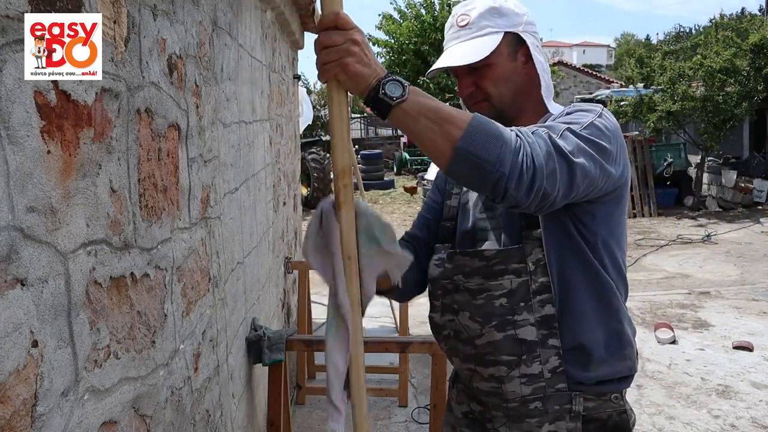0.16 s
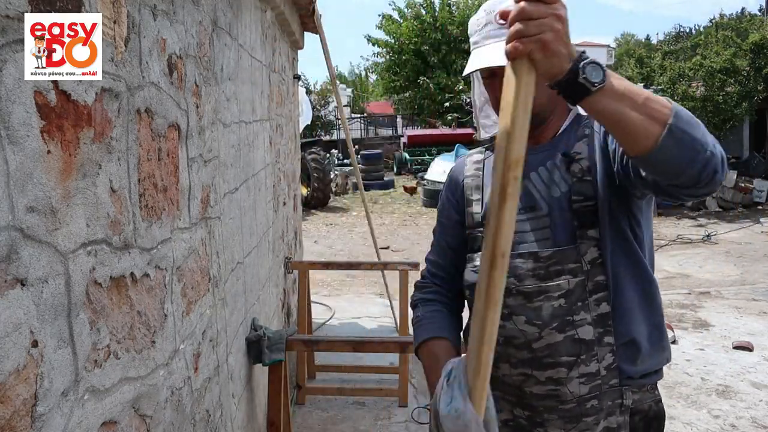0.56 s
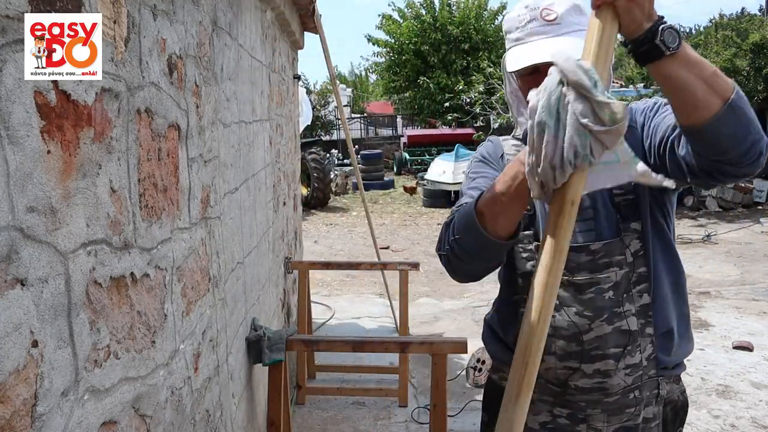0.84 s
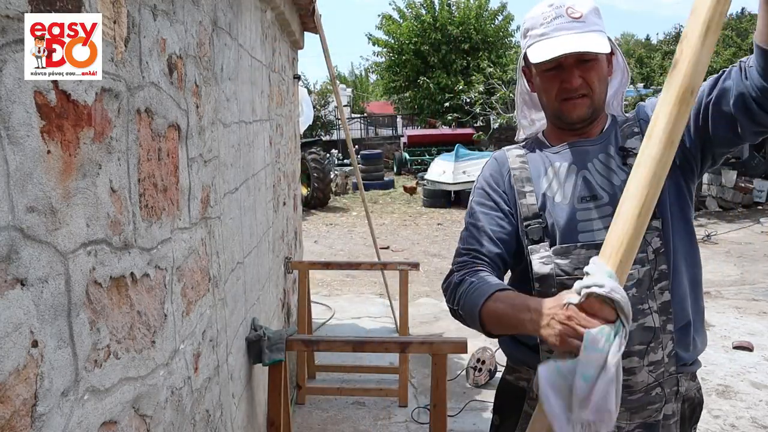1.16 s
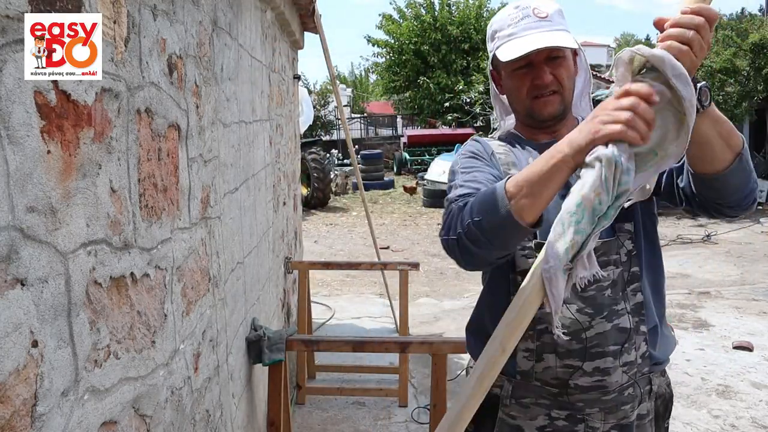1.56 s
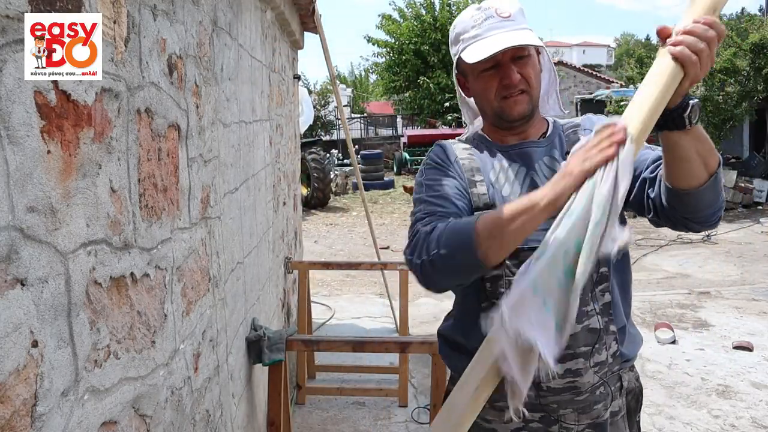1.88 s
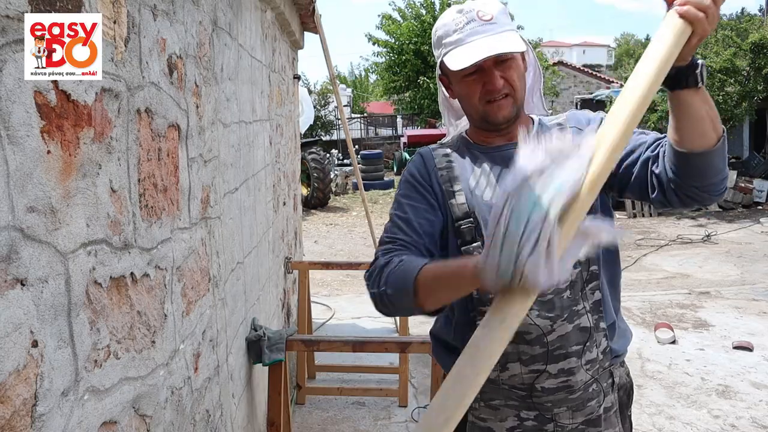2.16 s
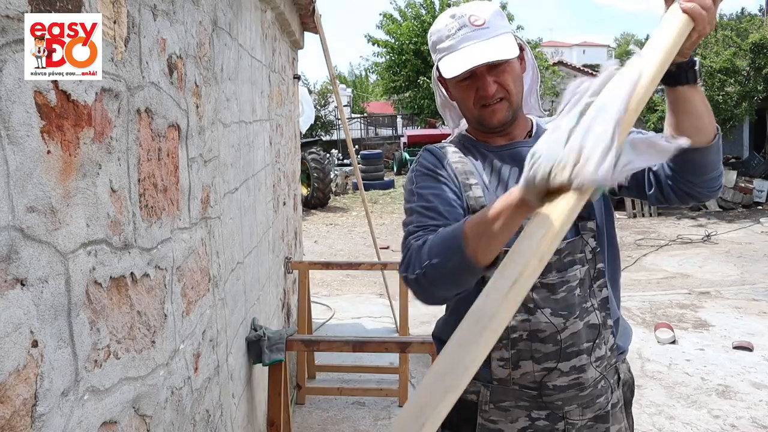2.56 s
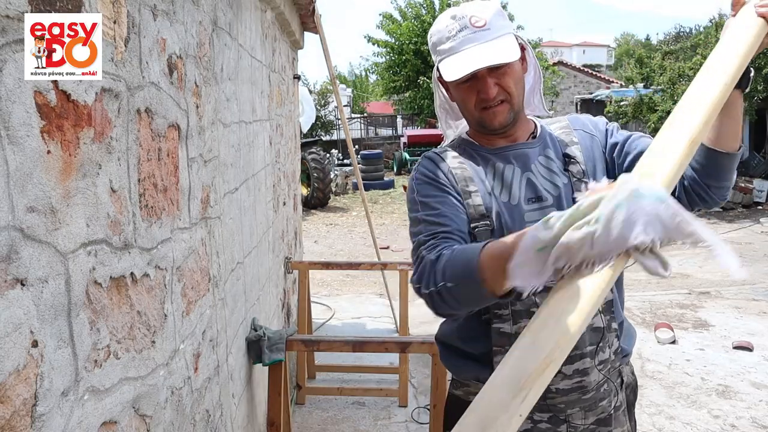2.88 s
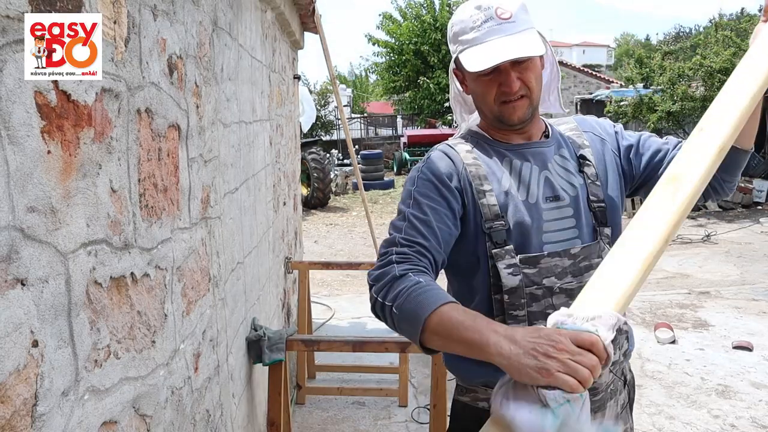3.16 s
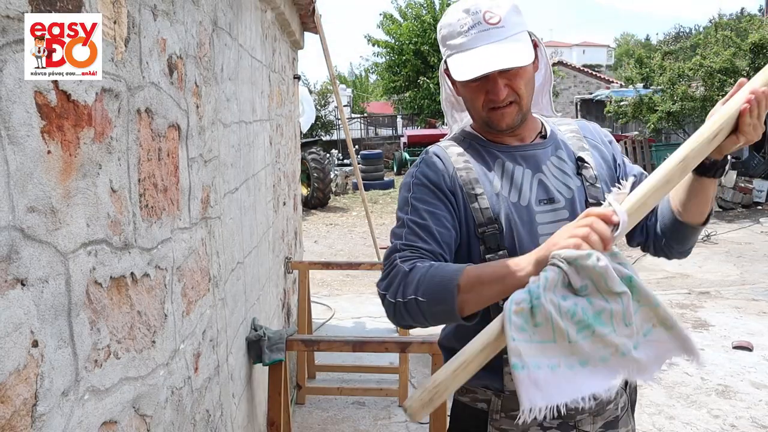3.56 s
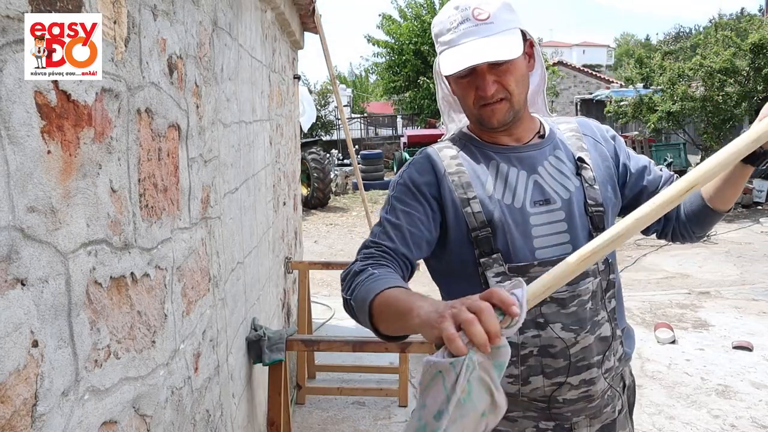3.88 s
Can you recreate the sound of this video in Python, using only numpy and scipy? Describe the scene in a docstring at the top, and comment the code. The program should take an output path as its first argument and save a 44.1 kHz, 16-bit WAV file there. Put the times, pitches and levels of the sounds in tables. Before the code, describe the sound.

A damp cloth rubs a wooden oar in quick uneven strokes outdoors, with short wooden knocks early and soft low wind thumps.

```python
"""Outdoors, close to a mono camera microphone, a damp cloth is rubbed up and down a wooden oar: shaped noise hisses
with each stroke from the start, mostly muffled below 5 kHz, coming forward abruptly for moments of 13 to 260 ms.
A faint yard floor and breeze lie under it from the first moment, both coloured noise; from about 0.1 s gusts
and the flapping cloth rumble on the microphone, with single low thumps. The oar's ringing modes knock
clearly near 0.2 and 0.5 s, then fainter to the end; wet threads tick as bright noise bursts near 0.75 s."""
import sys
import numpy as np
from scipy import signal
from scipy.fft import rfft, irfft
from scipy.io import wavfile
from scipy.ndimage import uniform_filter1d

SR = 44100
rng = np.random.default_rng(int(sys.argv[2]) if len(sys.argv) > 2 else 0)


def wav_out(sig):
    """Save sig, one row per channel (or a flat mono array), as 16-bit PCM at SR to the path in sys.argv[1]."""
    wavfile.write(sys.argv[1], SR, np.round(np.clip(np.atleast_2d(sig).T, -1, 1) * 32767).astype(np.int16))


N = 177723
T = np.arange(N) / SR
HZ = np.fft.rfftfreq(N, 1 / SR)

# Strokes, each lasting until the next begins: start_s, speed_up_ms, hold_ms, slow_down_roundness (1 = straight
# in dB), hiss at 6-9.5 kHz as turn_db, full_db, held_db, treble_gain_db (above 9.5 kHz, during the hold),
# band levels against the hiss (below_3k_db, 3k_to_5k_db, 5k_to_6k_db, 9k5_to_12k_db, above_12k_db),
# extra sinking as a share of the hiss's (low_speeding_up, low_slowing_down, top_speeding_up, top_slowing_down)
HAND_STROKES = [(-.1, 87, 103, 1.24, -62, -39, -39.5, -0.5, (-7.5, -21, -1.5, -2.5, -3),
                (-.4, -.5, .2, .05)),
                (0.186, 74, 146, 1.34, -62.5, -38.5, -48.5, 3.5, (-8.5, -16, -1, -4.5, -5),
                (-0.59, .8, 0.21, .3)),
                (0.464, 75.4, 113, 0.97, -70, -41, -39, -5.5, (-2.5, -11, -1, -0.5, 0.5),
                (-0.15, .2, -0.14, .1)),
                (0.809, 75, 66, 0.98, -65, -41.5, -40.5, 3, (-8.5, -15, -1.5, -2, -2),
                (-0.69, .05, .6, .2)),
                (1.038, 77.5, 166, 0.44, -67.5, -39.5, -41, -3.5, (-3, -13, -1, -2.5, -1),
                (-0.25, .1, -0.0037, .3)),
                (1.411, 108, 5.3, 0.97, -66.5, -51, -48, 2, (-6, -11, -2, -3.5, -1), (-0.95, -.4, 1, .05)),
                (1.683, 142, 50, 0.92, -78.5, -42, -45, 6, (-4, -9.5, -1.5, -5.5, -11.5),
                (-0.13, 0.28, -0.37, .6)),
                (1.931, 51.4, 113, 1, -61.5, -42.5, -44.5, 2.5, (-15.5, -18.5, -5, -2.5, -4),
                (0.049, .05, 0.89, -.1)),
                (2.18, 110, 33, 1.26, -72, -42.5, -42, 2.5, (-10.5, -13, -2.5, -3.5, -4.5),
                (-0.74, -.1, .1, .5)),
                (2.441, 60, 39, 1.53, -62.5, -48, -48, -1, (-12.5, -13, -4, -4.5, -19),
                (-0.9, -.5, -.2, -.4)),
                (2.662, 89, 88, 1.3, -84.5, -42, -46, -1, (-11.5, -13.5, -2.5, 0, -5.5),
                (-0.75, -.2, -0.23, .5)),
                (2.907, 49.6, 117, 1.3, -62, -42, -55, 3, (-15, -15.5, -4.5, -5, -17),
                (-0.35, -.5, -0.24, -.5)),
                (3.14, 105, 54, 0.77, -82, -42.5, -43, 4, (-10.5, -13, -2.5, -7.5, -8),
                (-0.54, -.2, .1, .1)), (3.421, 66, 94, 0.73, -70.5, -43.5, -44, -0.5, (-10, -12, -8, 0, -5),
                (-0.41, .05, 0.094, -.1)),
                (3.666, 95.5, 120, 2.3, -72.5, -41.5, -44, 0.7, (-2.5, -11.5, 0.5, -4.5, -4.5),
                (-0.27, .05, 0.21, 0.18)),
                (4.002, 25, 50, 1.1, -64.5, -57, -55, .3, (-16, -4.5, 6, -10, -15), (.05, .05, .1, .1))]
# Extra sinking shared by all strokes, rows 3-5, 5-6 and 9.5-12 kHz: speeding_up_share, slowing_down_share
BAND_SINKS = [(-.3, .1), (-.1, .05), (.15, 0.019)]
# Part of the extra sinking of the nearer end of the spectrum taken on by those three bands: share
NEIGHBOUR_SHARES = [0.2, 0.078, 0.13]
# Moments the rub comes forward: start_s, end_s, level_db (1.3-3 kHz), softer_start_db, softer_end_db,
# mid_db (3-5 kHz against it), hand_hollow_from_hz, hand_hollow_to_hz, lift_from_db, lift_to_db (below 1.3 kHz),
# lowest band reached (first_hz, first_ms, then_hz, last_hz, last_ms)
FORWARD_MOMENTS = [(0.0, .165, -32.5, -5.5, 21.3, -1.5, 1910, 1630, 8, 10.5, (740, 100, 740, 950, 30.2)),
                   (.2, .338, -39, 5.5, 3, -0.5, 1520, 1950, 17, 4, (520, 30, 790, 620, 5)),
                   (.35, .372, -43, -15, 8.8, -4, 1660, 1670, 3, 5, (690, 5, 750, 950, 5)),
                   (.5, .722, -32.5, 7.5, 7.9, -5, 2100, 2430, 15.5, -13, (740, 161, 1110, 1200, 35.3)),
                   (.929, .942, -36.5, 8, 15, -4, 2250, 2050, -1, -8, (950, 5, 950, 950, 5)),
                   (1.098, 1.301, -32, 2, 12.2, -3.5, 2160, 1950, 4, 1.5, (570, 51.6, 1080, 1190, 59.4)),
                   (1.808, 1.821, -39, 4, 4.9, -1, 1970, 2070, 5, 9.5, (890, 5, 860, 890, 5)),
                   (1.849, 1.9, -39, -2, 6.1, -4.5, 2160, 2050, -2, 10, (820, 31, 630, 610, 5)),
                   (2.34, 2.36, -39, -10, 3, -5.5, 2000, 1880, 2, -10, (270, 5, 210, 290, 5)),
                   (3.279, 3.322, -39.5, -6, 10, -1.5, 1970, 2000, 4, -8, (350, 5, 380, 430, 5)),
                   (3.728, 3.985, -32.5, 0.2, 19, -3, 1900, 1780, 8, 9, (740, 48, 1080, 740, 85.4))]
# Borders of the bands of the rub: edge_hz
BAND_EDGES_HZ = [150, 300, 450, 600, 780, 1000, 1130, 1250, 3050, 5000, 6100, 9500, 12000, 16000]
# Bending modes of the oar shaft: pitch_hz, width_hz, rubbed_db, struck_db (both relative)
SHAFT_MODES = [(138, 50, -30, -1), (278, 30, -20, -2), (510, 60, -20, -14), (650, 60, -16, -10),
               (856, 22, -6, -4), (1012, 40, -8, -8), (1190, 35, 3, -16), (1378, 35, 3, -17),
               (1588, 45, 2, -19), (1800, 50, 3, -20), (2045, 60, 4, -22), (2290, 80, 3, -24),
               (2500, 70, 2, -26), (2815, 90, 2, -28), (3180, 90, -4, -30), (3525, 90, -4, -30)]
# Colour of cloth on grain: pitch_hz, density_db (per Hz, relative)
CLOTH_COLOUR = [(650, -13), (1100, -12.5), (1200, -11.5), (1480, -4), (2020, -6.5), (3600, -4),
                (4160, -3.5), (5420, -3), (9970, -4.5), (13300, -5), (15500, -7.5)]
# A narrow band of the rub swells and fades, or the cloth thuds: start_s, end_s, from_hz, to_hz, width_hz, level_db
NARROW_SWELLS = [(0, 0.064, 1234, 1214, 60, -35.5), (0.2, 0.223, 616, 517, 350, -42.5),
                 (0.205, 0.206, 1500, 1130, 150, -25), (0.262, 0.326, 1570, 1570, 50, -42.5),
                 (0.34, 0.379, 1620, 1570, 80, -46), (0.499, 0.53, 150, 130, 90, -35),
                 (0.533, 0.722, 2930, 3430, 865, -34.5), (0.549, 0.655, 945, 960, 118, -51),
                 (0.764, 0.86, 5250, 5400, 500, -56.5), (0.792, 0.864, 1960, 2050, 200, -54),
                 (0.992, 1.11, 1820, 1950, 150, -55.5), (1.17, 1.224, 2750, 2040, 120, -34.5),
                 (1.231, 1.309, 1327, 1367, 60, -41), (1.395, 1.675, 5540, 5500, 500, -56),
                 (1.426, 1.503, 2050, 1970, 200, -56), (1.5, 1.71, 577, 576, 314, -59.5),
                 (2.036, 2.13, 1530, 1500, 150, -61), (1.961, 2.033, 2400, 2440, 200, -55),
                 (2.336, 2.364, 506, 500, 404, -47), (2.384, 2.44, 300, 300, 200, -61),
                 (2.677, 3, 500, 600, 400, -63), (3.28, 3.326, 1790, 1796, 91, -40),
                 (3.283, 3.324, 810, 750, 151, -48.5), (3.562, 3.627, 306, 267, 188, -48),
                 (3.735, 3.777, 1690, 1890, 80, -33), (3.808, 3.842, 2040, 2080, 80, -40),
                 (3.858, 3.967, 860, 810, 302, -57), (3.859, 3.93, 2140, 1420, 121, -35)]
# Colour of the yard floor: pitch_hz, density_db (per Hz, relative)
YARD_COLOUR = [(71, -20), (120, 6.5), (160, 4), (734, 4), (864, 6), (1270, 3), (1590, 2), (4770, -12),
               (5280, -12), (11700, -11), (15500, -8)]
# Colour of wind on the microphone: pitch_hz, density_db (per Hz, relative)
RUMBLE_COLOUR = [(15, 3), (40, -5), (80, -5.5), (125, -13), (150, -19), (300, -32), (600, -39), (1200, -88)]
# Gusts and flaps of the cloth: peak_s, level_db, rise_ms, fall_ms (each for 20 dB)
GUST_ROWS = [(0.129, -72, 40, 50), (.215, -63, 60, 70), (.54, -47.5, 118, 120), (.652, -49, 20, 67),
             (.745, -47.5, 100, 86), (1.103, -46.5, 84, 92), (1.275, -32, 27, 126), (1.34, -56, 82, 49),
             (1.575, -43, 64, 70), (1.862, -48, 50, 50), (2.342, -29.5, 20, 25), (2.87, -43, 44, 90),
             (2.91, -47, 62, 54), (3.578, -61, 62, 43), (3.96, -51, 53, 53)]
# Single low thumps, some falling with the knocks: centre_s, level_db, length_ms, signed_factor (scales the level)
LOW_PUSHES = [(0.21, -34, 2.1, 1), (0.5077, -22, 4.0, 0.65), (0.746, -32, 6.2, 0.74), (1.3, -34, 6.7, -1.4),
              (1.334, -28, 15, 0.84), (1.576, -36, 6.4, -1.1), (2.349, -26, 8.5, -0.83),
              (2.884, -39, 25, 0.77), (2.915, -40, 14, -0.95)]
# Blows on the oar: time_s, strength_db, contact_ms, place (0-1 along the shaft), stop_s (the ring breaks off abruptly)
OAR_BLOWS = [(.2035, -33.5, .35, .5, .222), (.2106, -42, .3, .5, .228), (.5008, -34, .3, .03, .529),
             (.5044, -29.5, .35, .03, .529), (.5079, -23.5, .4, .03, .529), (.5295, -41, .8, .03, .552),
             (.817, -52, .4, .3, .825), (1.855, -40, 1.4, .08, 1.872), (1.1, -38, 1.5, .4, 1.12),
             (3.958, -40, 1.5, .4, 3.98)]
# Wet threads snap: time_s, strength_db (relative)
THREAD_TICKS = [(0.747, -26.5), (0.7653, -28)]

SPEED_UP = 1.35  # roundness of the speeding up
START_BEND, END_BEND = 15, 6.8  # higher keeps the softening nearer to each end of a forward moment
MID_EDGE_DB = -5.0  # further change of 3-5 kHz at both ends
BREEZE_DB, BREEZE_WANDER_DB, YARD_DB = -61.5, 0.5, -59.5
LOW_PASS_HZ = 15720


def amp(db):
    """Decibels to gain."""
    return 10 ** (np.asarray(db) / 20)


def evened(x):
    """Scales to rms 1."""
    return x / np.sqrt(np.mean(x ** 2) + 1e-20)


def coloured(x, points):
    """Weights the spectrum of x by a curve read on a log-frequency axis, at rms 1."""
    hz, db = np.transpose(points)
    curve_db = np.interp(np.log(HZ + 1), np.log(hz + 1), db)
    return evened(irfft(rfft(x) * amp(curve_db), N))


def resonate(x, hz, width):
    """Shifts the pitch hz down to zero, smooths, and shifts back: a resonance of gain 1."""
    turn = np.exp(2j * np.pi * np.cumsum(hz * np.ones(len(x))) / SR)
    decay = np.exp(-np.pi * width / SR)
    return 2 * (turn * signal.lfilter([1 - decay], [1, -decay], x / turn)).real


def flutter(db, count):
    """Random gain that wanders by db over about count samples, with power 1."""
    wander = uniform_filter1d(rng.standard_normal(N), count)
    wander = uniform_filter1d(wander, count)
    return evened(amp(db * evened(wander)))


def bump(s, ms):
    """A smooth pulse of height 1 centred at s; ms spans two standard deviations."""
    return np.exp(-.5 * ((T - s) / (ms / 2000)) ** 2)


def stroking():
    """Hiss level and five bands tied to it: a stroke speeds up from its turn, holds, slows into the next turn."""
    levels = np.zeros((6, N))
    next_turns = [(row[0], row[4]) for row in HAND_STROKES[1:]] + [(T[-1] + 1, -80)]
    for stroke, (next_s, next_db) in zip(HAND_STROKES, next_turns):
        s, up_ms, hold_ms, slow_down, turn_db, full_db, held_db, gain_db, band_db, ends = stroke
        t, hold_end = T - s, (up_ms + hold_ms) / 1000
        up = np.clip(t * 1000 / up_ms, 0, 1)
        hold = np.clip((t * 1000 - up_ms) / hold_ms, 0, 1)
        down = np.clip((t - hold_end) / max(next_s - s - hold_end, .01), 0, 1)
        early = (turn_db - full_db) * (1 - up) ** SPEED_UP
        late = (next_db - held_db) * down ** slow_down
        hiss_db = full_db + (held_db - full_db) * hold + early + late

        low_end, top_end = ends[:2], ends[2:]
        nearer_end = np.array([low_end, low_end, top_end])
        inner = np.array(BAND_SINKS) + np.array(NEIGHBOUR_SHARES)[:, None] * nearer_end
        rows = [hiss_db]
        for db, (up_share, down_share) in zip(band_db, [low_end, *inner, top_end]):
            rows.append(hiss_db + db + up_share * early + down_share * late)
        rows = np.array(rows)
        rows[4:] += gain_db * hold  # the two bands above 9.5 kHz
        levels = np.where(t >= 0, rows, levels)
    return uniform_filter1d(levels, size=600, axis=1, mode="nearest")


def coming_forward():
    """Whether the rub is forward, its levels, the hollow of the hand and the lowest band that it reaches."""
    out, forward = np.zeros((5, N)), np.zeros(N, bool)
    for k, moment in enumerate(FORWARD_MOMENTS):
        start, end, db, start_db, end_db, mid_db, from_hz, to_hz, from_db, to_db, reach = moment
        first_hz, first_ms, then_hz, last_hz, last_ms = reach
        u = np.clip((T - start) / (end - start), 0, 1)
        early, late = (1 - u) ** START_BEND, u ** END_BEND
        near_db = db - start_db * early - end_db * late
        near_mid_db = mid_db + MID_EDGE_DB * (early + late)
        hand_hz = from_hz + (to_hz - from_hz) * u
        lift_db = from_db + (to_db - from_db) * u
        reach_hz = np.where(T < end - last_ms / 1000, then_hz, last_hz)
        reach_hz = np.where(T < start + first_ms / 1000, first_hz, reach_hz)
        rows = [near_db, near_mid_db, hand_hz, lift_db, reach_hz]
        # settings change 4 ms ahead of the moment
        out = np.where((T >= start - .004) | (k == 0), rows, out)
        forward |= (T > start - 1 / SR) & (T < end)
    return forward, *out


def rub():
    """Fibres slip over the grain, ring the shaft and the cupped hand; each band is then muffled or let forward."""
    hiss_db, low_db, mid_db, *treble_db = stroking()
    forward, near_db, near_mid_db, hand_hz, lift_db, reach_hz = coming_forward()
    slips = rng.standard_normal(N) * flutter(0.66, count=40) * flutter(0.77, count=500)
    cloth = coloured(slips, [(200, -16), (700, -10.5)] + CLOTH_COLOUR)
    # the moving hand passes the nodes of each mode, so each waxes and wanes on its own
    shaft = np.zeros(N)
    for hz, width, rubbed_db, _ in SHAFT_MODES:
        shaft += amp(rubbed_db) * resonate(cloth * flutter(3.2, count=1500), hz, width)
    hand = resonate(cloth, hand_hz, 550)
    spectrum = rfft(cloth + amp(8.0) * shaft + amp(8.0) * hand)

    bands = []
    for lo, hi in zip(BAND_EDGES_HZ, BAND_EDGES_HZ[1:]):
        band = irfft(spectrum * ((HZ >= lo) & (HZ < hi)), N)
        bands.append(band * flutter(0.86, count=350))  # folds of the cloth catch unevenly, band by band
    body = np.sqrt(np.mean(bands[7] ** 2))  # the low bands keep their natural share of the 1.3-3 kHz band
    out = np.zeros(N)
    for lo, band in zip(BAND_EDGES_HZ[:8], bands):
        share = uniform_filter1d(forward * (lo >= reach_hz) * 1., size=130, mode="nearest")
        forward_gain = amp(near_db + lift_db * (lo < BAND_EDGES_HZ[7]))
        out += band / body * (share * forward_gain + (1 - share) * amp(low_db))
    share = uniform_filter1d(forward * 1., size=130, mode="nearest")
    out += evened(bands[8]) * (share * amp(near_db + near_mid_db) + (1 - share) * amp(mid_db))
    for band, db in zip(bands[9:], [treble_db[0], hiss_db, treble_db[1], treble_db[2]]):
        out += evened(band) * amp(db)
    return out


def swells():
    """Friction noise through one narrow gliding resonance, applied twice, that fades in and out."""
    out = np.zeros(N)
    for start, end, from_hz, to_hz, width, db in NARROW_SWELLS:
        inside = slice(round(max(start, 0) * SR), round(end * SR))
        size = len(T[inside])
        hz = np.linspace(from_hz, to_hz, size)
        note = resonate(rng.standard_normal(size), hz, width)
        note = resonate(note, hz, 2 * width)
        out[inside] += amp(db) * evened(note) * signal.windows.tukey(size, .6)
    return out


def yard():
    """Faint outdoor floor: coloured noise whose level drifts."""
    return amp(YARD_DB) * coloured(rng.standard_normal(N), YARD_COLOUR) * flutter(3.0, count=1500)


def wind():
    """Breeze and gusts rumble lumpily, with single smooth low thumps, some falling with the knocks."""
    level = amp(BREEZE_DB) * flutter(BREEZE_WANDER_DB, count=2000)
    for s, db, up_ms, down_ms in GUST_ROWS:
        away = np.maximum((s - T) * 1000 / up_ms, (T - s) * 1000 / down_ms)
        level += amp(db - 20 * away)
    out = coloured(rng.standard_normal(N) * flutter(1.9, count=400), RUMBLE_COLOUR) * level
    for s, db, ms, factor in LOW_PUSHES:
        out += factor * amp(db) * bump(s, ms)
    return out


def knocks():
    """A short force pulse rings the modes: longer contact sounds duller, a mode struck at its node stays quiet."""
    out, t = np.zeros(N), T[:4096]
    thud_colour = [(60, -14), (180, 5.0), (380, -5.5), (800, -7.0), (1300, -2.5), (4000, -57)]
    for s, db, contact_ms, place, stop in OAR_BLOWS:
        # the dull wood between the modes, weaker for places further along and dying by 160 dB a second
        thud = coloured(rng.standard_normal(N), thud_colour)[:len(t)]
        ring = thud * amp(-1.5 - 29.0 * place - 160 * t)
        for k, (hz, width, _, struck_db) in enumerate(SHAFT_MODES):
            reached = .1 + abs(np.cos(np.pi * k * place))
            ring += amp(struck_db) * reached * np.exp(-np.pi * width * t) * np.sin(2 * np.pi * hz * t)
        force = amp(db) * bump(s, contact_ms) / (contact_ms * SR / 1000)
        break_off = amp(-3000 * np.maximum(T - stop, 0))
        out += signal.oaconvolve(force, ring)[:N] * break_off
    # the knocks carry nothing below about 60 Hz
    return signal.sosfilt(signal.butter(2, 60, "high", fs=SR, output="sos"), out)


def ticks():
    """Wet threads snap as millisecond bursts of bright noise."""
    burst = np.zeros(N)
    for s, db in THREAD_TICKS:
        burst += amp(db) * (T >= s) * np.exp(-np.maximum(T - s, 0) / 0.00071)
    colour = [(2500, -12), (5000, -1), (9000, 0), (11500, -10), (13000, -30)]
    return 0.49 * burst * coloured(rng.standard_normal(N), colour)


def scene():
    """One close microphone feeds both channels."""
    mono = rub() + swells() + yard() + wind() + knocks() + ticks()
    return np.tile(mono, (2, 1))


def record(dry):
    """Steep low-pass: the upper band limit of the sound."""
    taps = signal.firwin(1023, LOW_PASS_HZ, window=("kaiser", 9), fs=SR)
    return signal.oaconvolve(dry, taps[None], "same")


dry = scene()
out = record(dry)
wav_out(out)
```